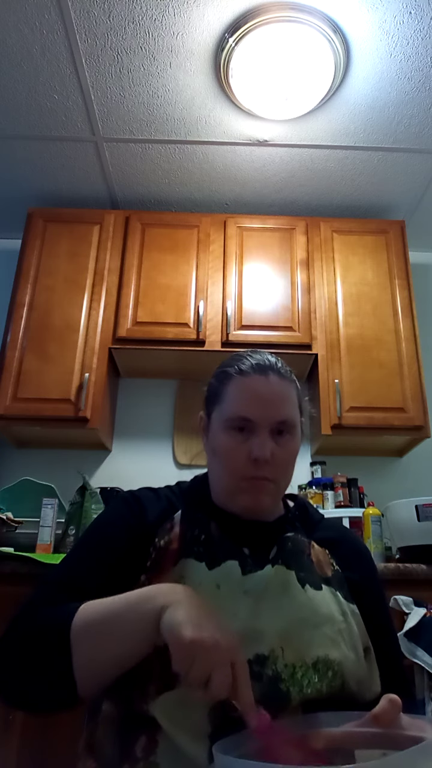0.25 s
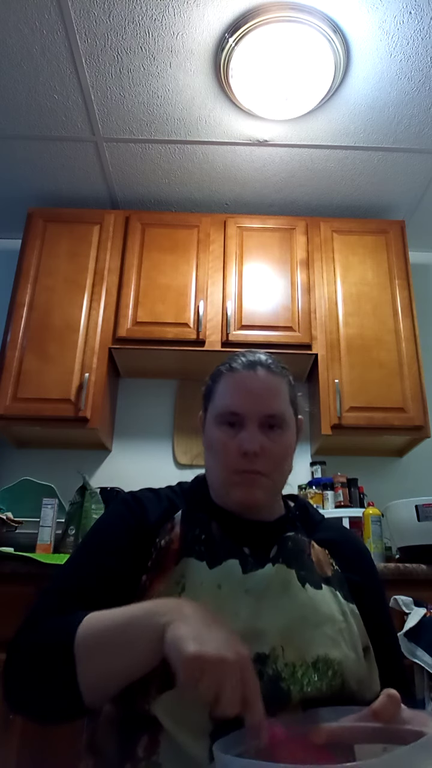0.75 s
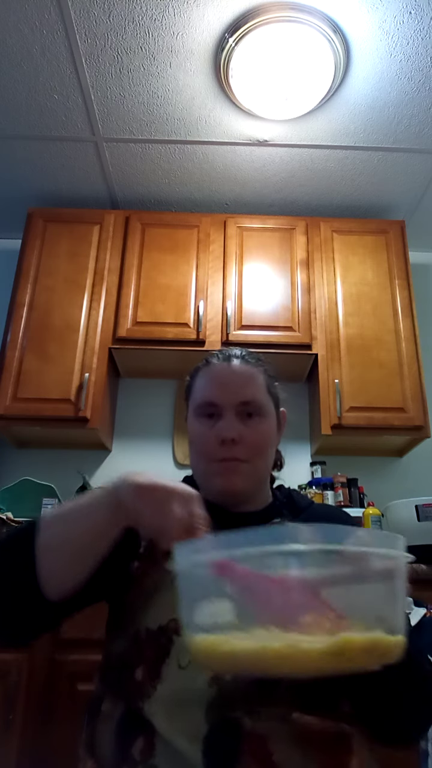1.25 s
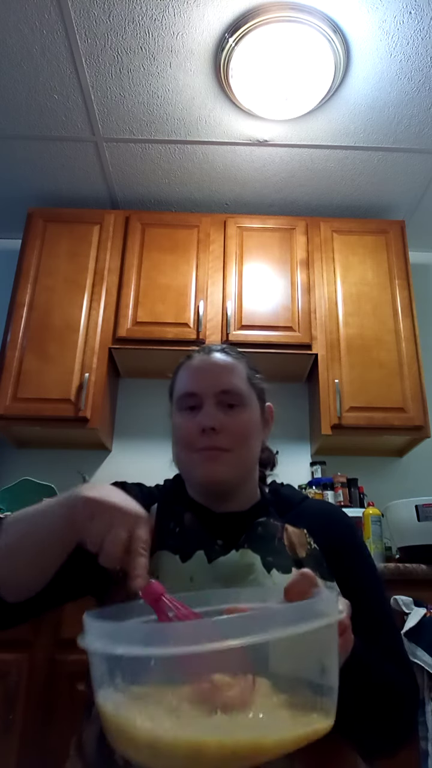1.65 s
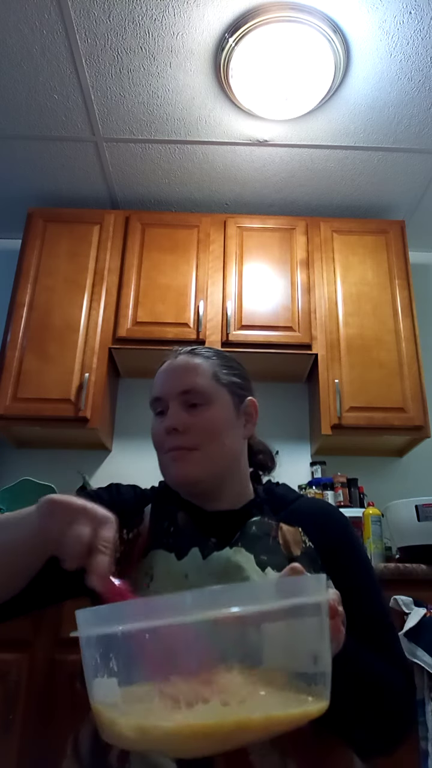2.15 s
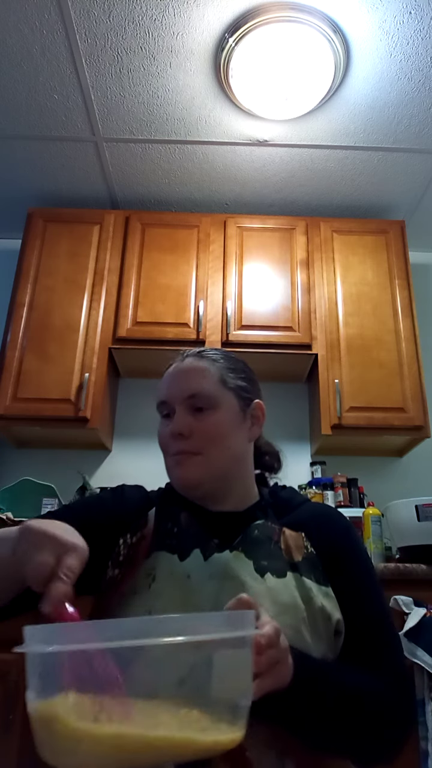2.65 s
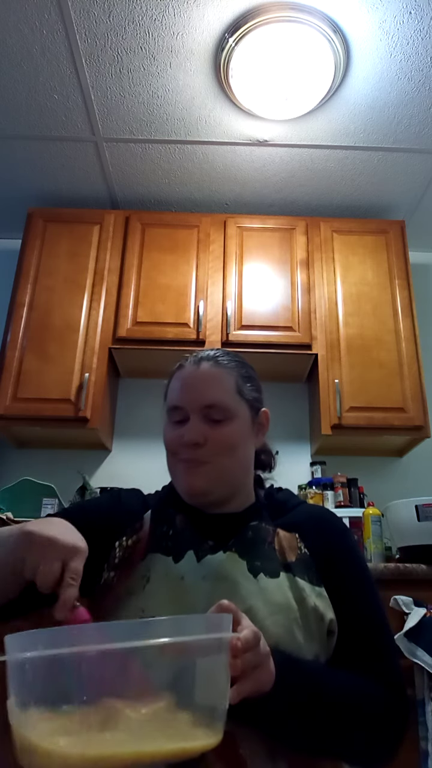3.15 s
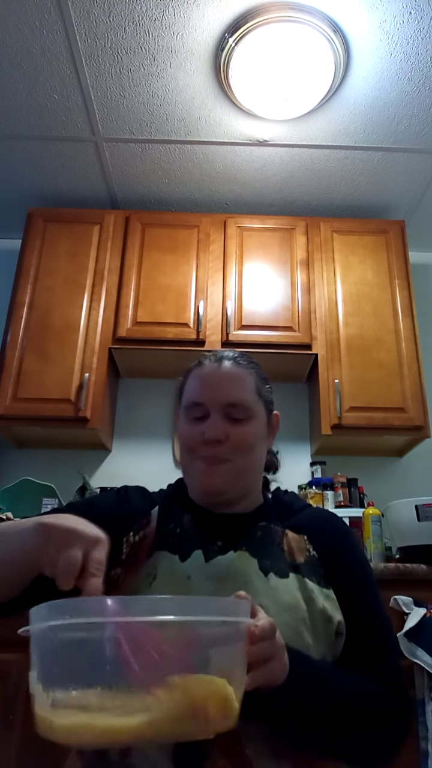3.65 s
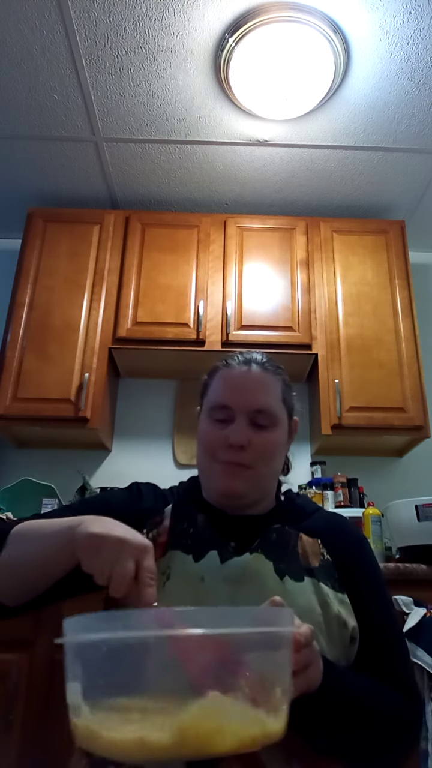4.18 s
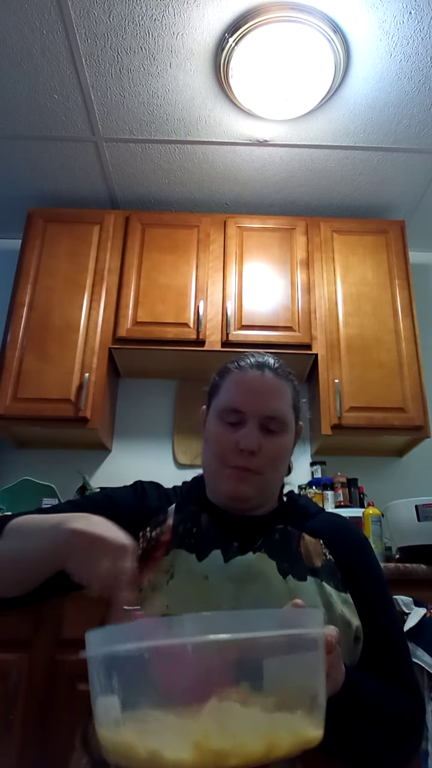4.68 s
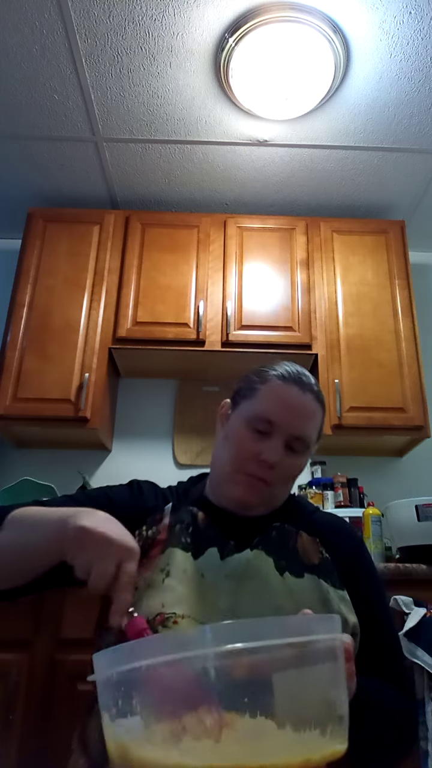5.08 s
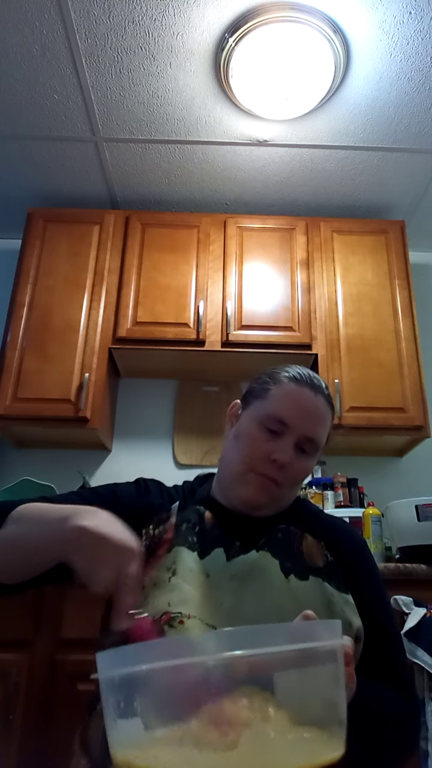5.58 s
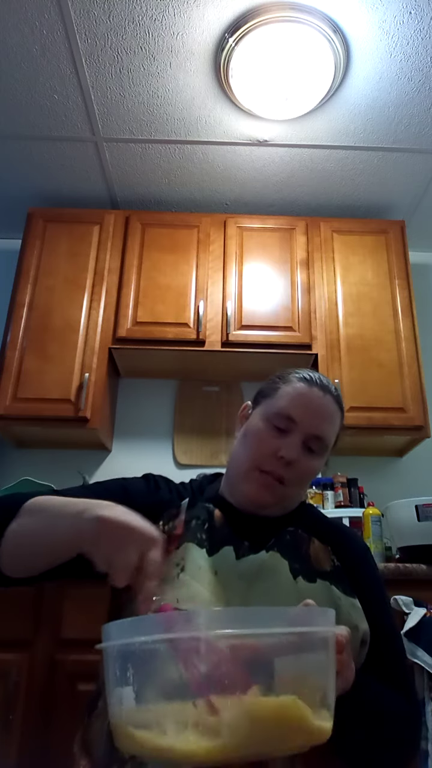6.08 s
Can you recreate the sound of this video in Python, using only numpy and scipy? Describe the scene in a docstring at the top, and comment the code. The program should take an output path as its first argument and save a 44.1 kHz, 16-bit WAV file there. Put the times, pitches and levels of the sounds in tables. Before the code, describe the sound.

A soft whisk beats a wet mixture in a hand-held plastic bowl, with sloshes, plops and a burst of hollow knocks midway.

```python
"""A soft whisk beats a wet mixture in a hand-held plastic bowl, in a quiet kitchen with a short echo.
First come dense strokes: filtered crackle sloshes and peels, ringing air pockets plop, wet films smack.
Knocks on the bowl wall (wall flexure, modes, contact ticks) then grow, loudest at 2.3 s, crowded until 3 s.
After that the strokes soften over a few faint knocks and plops, and the bubble froth slowly fades.
Hiss in drifting patches and steady noise of room and microphone run throughout."""
import sys
import numpy as np
from scipy import signal
from scipy.fft import rfft, irfft
from scipy.io import wavfile
from scipy.ndimage import map_coordinates

SR = 44100
rng = np.random.default_rng(int(sys.argv[2]) if len(sys.argv) > 2 else 0)


def put_to_file(sound):
    """Save the sound as 16-bit audio at rate SR, in the file named by the first command-line argument."""
    columns = np.atleast_2d(sound).T  # one column per channel
    safe = np.clip(columns, -1, 1)
    whole_steps = np.round(safe * 32767)
    wavfile.write(sys.argv[1], SR, whole_steps.astype(np.int16))


N = 278712


def amp(db):
    """Decibels to amplitude ratio."""
    return 10 ** (np.asarray(db) / 20)


def unit(x):
    """Scale to an RMS of 1."""
    return x / np.sqrt(np.mean(x ** 2) + 1e-20)


def unit_over(x, length_s):
    """Scale so that the energy of x equals an RMS of 1 held for length_s."""
    return x / np.sqrt(np.sum(x ** 2) / (length_s * SR))


def read(points, hz):
    """Spectrum points joined on a log-frequency axis."""
    point_hz, value = np.transpose(points)
    return np.interp(np.log(hz + 1), np.log(point_hz + 1), value)


def add(mix, start_s, sound):
    """Mix a sound in from start_s, cut at the end of the mix."""
    part = mix[max(round(start_s * SR), 0):][:len(sound)]
    part += sound[:len(part)]


def colour(x, gain_db, size=4096):
    """Causal minimum-phase filter; gain_db is a function of frequency."""
    hz = abs(np.fft.fftfreq(size, 1 / SR))
    log_gain = np.log(amp(gain_db(hz)))
    taps = np.fft.ifft(np.exp(np.conj(signal.hilbert(log_gain)))).real
    return signal.fftconvolve(x, taps[:size // 2])[:len(x)]


def cavity(x, hz, steep_db, skirt_db, ripple_db, low_hz=450):
    """The gap between whisk and mixture: a broad hump with chance resonances on it."""
    ripple = np.column_stack([np.geomspace(400, 12000, 48), rng.uniform(-1, 1, 48)])

    def gain_db(f):
        octaves = np.log2((f + 1) / hz)
        hump_db = -skirt_db * np.tanh(steep_db * octaves ** 2 / skirt_db)
        low_cut_db = -20 * np.log10(1 + (low_hz / (f + 20)) ** 2)
        return hump_db + ripple_db * read(ripple, f) + low_cut_db
    return colour(x, gain_db)


def snaps(t, per_s, wet=0.027):
    """Tiny impulses of random size and sign over a faint wet fizz."""
    chance, size, sign = rng.random((3, len(t)))
    impulses = (chance < per_s / SR) * (.3 - np.log(size)) * np.sign(sign - .5)
    return impulses + wet * rng.standard_normal(len(t))


def bubble(hz, cycles, glide=.08, swell=.2):
    """An air pocket swells in, rings and rises in pitch as it nears the surface; envelope peak 1."""
    age = np.arange(int(2 * cycles * SR / hz) + 2) * hz / SR / cycles
    envelope = (1 - np.exp(-(age / swell) ** 2)) * np.exp(-2 * age * np.sqrt(age))
    turns = cycles * age * (1 + glide * (age - 1) / 2)
    return envelope / envelope.max() * np.sin(2 * np.pi * turns)


def plop(db, hz, wet_db=-13, wet_s=0.0045, cycles_1khz=6.9, cycles_power=0.4):
    """One bubble and the spatter of its skin; returns the spatter's lead in s and the sound."""
    t = np.arange(SR // 25) / SR
    burst = snaps(t, per_s=4800) * np.exp(-(t / wet_s - 1) ** 2)
    spatter = cavity(burst, hz, steep_db=5.5, skirt_db=42, ripple_db=22)
    out = amp(wet_db) * spatter / abs(spatter).max()
    # smaller pockets ring for more cycles
    cycles = max(cycles_1khz * (hz / 1000) ** cycles_power, 3)
    add(out, wet_s / 2, bubble(hz, cycles))
    return wet_s / 2, amp(db) * out


def tear(db, hz, length_s):
    """A film tears in a quick run of snaps."""
    t = np.arange(SR // 10) / SR
    run = snaps(t, per_s=2400) * np.exp(-(t / length_s) ** 4)
    run = cavity(run, hz, steep_db=11.5, skirt_db=16.5, ripple_db=3.5)
    return amp(db) * unit_over(run, length_s)


# steady room tone and microphone hiss, spectrum shape: freq_hz [Hz], density_db [dB per Hz, relative]
HUSH_SPECTRUM = [(20, -19.5), (60, -3), (125, 2.5), (180, -3), (240, -0.5), (400, -7), (1700, -16.5),
                 (2050, -10.5), (2400, -23.5), (6200, -16), (8000, -25.5), (13800, -27), (15000, -15),
                 (16000, -15)]


def hush(level_db):
    """Steady room tone and hiss: noise shaped by a fixed spectrum."""
    hz = np.fft.rfftfreq(N, 1 / SR)
    spectrum = rfft(rng.standard_normal(N)) * amp(read(HUSH_SPECTRUM, hz))
    return amp(level_db) * unit(irfft(spectrum, N))


# whisk sliding through mixture, spectrum shape: freq_hz [Hz], density_db [dB per Hz, relative]
SWISH_SPECTRUM = [(250, -12), (700, -1.5), (1300, -18.5), (2050, 6), (2500, -6.5), (3400, 0.5), (6200, 0),
                  (8000, -15), (16000, -25.5)]


def swish(level_db=-72, patch_db=5.0, patch_hz=450, patch_s=.09):
    """The whisk slides through the mixture all the while: a faint hiss in drifting patches."""
    hz, t, z = signal.stft(rng.standard_normal(N), SR, nperseg=512)
    knots = rng.standard_normal((200, 400))
    grid = np.meshgrid(hz / patch_hz, t / patch_s, indexing="ij")
    patches = map_coordinates(knots, grid, order=1, mode="mirror")
    z *= amp(read(SWISH_SPECTRUM, hz)[:, None] + patch_db * patches)
    return amp(level_db) * unit(signal.istft(z, SR, nperseg=512)[1][:N])


def froth(low_hz=650, high_hz=7000, per_s=900, cycles=6, spread_db=5.5, level_db=-72, fade_db=6, count=40):
    """Fine bubbles burst all the time, fading in level as the beating settles."""
    out = np.zeros(N)
    for hz in np.geomspace(low_hz, high_hz, count):
        size = amp(spread_db * np.minimum(rng.exponential(1, N), 3))
        pops = size * (rng.random(N) < per_s / SR / count)
        out += signal.oaconvolve(pops, np.sqrt(hz) * bubble(hz, cycles))[:N]
    return unit(out) * amp(level_db + fade_db * np.linspace(.5, -.5, N))


# whisk strokes, shared by strays, films and sloshes: middle_s [s], slosh_db [dB before trim],
# bubble_hz [Hz], half_s [half length, s], film_db [dB before trim]
WHISK_STROKES = [(.02, -56.5, 1560, 0.019, -58), (0.148, -53.5, 1400, 0.038, -73.5),
                 (0.255, -57.5, 1337, 0.031, -73), (.46, -51.5, 1225, 0.073, -57.5),
                 (.655, -54, 1360, 0.033, -63.5), (.83, -55, 1357, 0.062, -56.5),
                 (1.001, -62, 1243, 0.045, -64), (1.317, -65, 1540, 0.04, -61),
                 (1.649, -55, 1400, 0.028, -57), (1.842, -92, 1610, 0.068, -62),
                 (2.208, -55.5, 1600, 0.018, -57), (2.554, -65.5, 1426, 0.046, -68),
                 (3.183, -67.5, 1050, 0.031, -86), (3.343, -67.5, 684, 0.045, -80),
                 (3.732, -64.5, 1784, .02, -78), (4.115, -63.5, 985, 0.026, -75),
                 (4.243, -69, 1010, 0.016, -55.5), (4.531, -62.5, 1386, 0.028, -63),
                 (4.717, -70.5, 1600, 0.057, -64.5), (4.863, -64, 1800, 0.014, -75.5),
                 (5.242, -63, 1136, 0.023, -71), (5.425, -63, 605, 0.036, -74),
                 (5.601, -63, 778, 0.033, -62), (6.042, -66.5, 970, 0.072, -63)]


def strays(count=12, per_s=50, over_slosh_db=8.5, spread_db=4, pitch_ratio=1.244, spread_octaves=0.78):
    """Each stroke sheds a few small plops at random, scattered about a pitch above its slosh."""
    out = np.zeros(N)
    for middle_s, slosh_db, bubble_hz, half_s, _ in WHISK_STROKES:
        for k in range(count):
            place, size, pitch = rng.uniform(-1, 1, 3)
            hz = bubble_hz * pitch_ratio * 2 ** (spread_octaves * pitch)
            lead_s, sound = plop(slosh_db + over_slosh_db + spread_db * size, hz)
            # longer strokes shed more; the last plop may be partial
            share = np.clip(2 * half_s * per_s - k, 0, 1)
            add(out, middle_s + half_s * place - lead_s, share * sound)
    return out


def films(trim_db=-1, scatter=0.19, early_hz=4900, late_hz=3200, stretch=1.5, clump_s=0.0079, clump_db=3.5):
    """Thin films peel off all through each stroke, in a clumped crackle that dulls as the beating goes on."""
    out, t = np.zeros(N), np.arange(-SR // 5, SR // 5) / SR
    for middle_s, _, _, half_s, film_db in WHISK_STROKES:
        length_s = half_s * stretch
        centre_hz = early_hz + (late_hz - early_hz) * middle_s * SR / N
        hz = centre_hz * np.exp(scatter * rng.normal())
        drift = np.interp((t - t[0]) / clump_s, np.arange(400), rng.uniform(-2, 2, 400))
        peel = snaps(t, per_s=1000) * amp(clump_db * drift) * np.exp(-(t / length_s) ** 2)
        peel = cavity(peel, hz, steep_db=8.5, skirt_db=18.5, ripple_db=10.5)
        peel = amp(film_db + trim_db) * unit_over(peel, length_s)
        add(out, middle_s + t[0], peel[middle_s + t >= 0])
    return out


def sloshes(trim_db=-2.0, gulp_db=0, gulp_cycles=22):
    """Each stroke squeezes out a swelling crowd of small bubbles and sets a trapped air pocket ringing."""
    out, t = np.zeros(N), np.arange(-SR // 5, SR // 5) / SR
    for middle_s, slosh_db, bubble_hz, half_s, _ in WHISK_STROKES:
        drive = snaps(t, per_s=1400) * np.exp(-(t / half_s) ** 2)
        gulp = signal.fftconvolve(drive, bubble(bubble_hz, gulp_cycles))[:len(t)]
        crowd = cavity(drive, bubble_hz, steep_db=6.5, skirt_db=35.5, ripple_db=6.0)
        slosh = unit(crowd) + amp(gulp_db) * unit(gulp)
        slosh = amp(slosh_db + trim_db) * unit_over(slosh, half_s)
        add(out, middle_s + t[0], slosh[middle_s + t >= 0])
    return out


# thick wet films snapping off the whisk: start_s [s], level_db [dB before trim], centre_hz [Hz], length_s [s]
FILM_SMACKS = [(0.048, -48.5, 2740, 0.008), (0.114, -45.5, 3280, 0.0063), (0.789, -47, 4100, 0.0036),
               (0.795, -39.5, 4330, 0.0099), (1.008, -42, 4000, 0.0051), (1.631, -47, 4300, 0.0053),
               (2.162, -50, 5200, 0.024), (2.229, -48.5, 5160, 0.018), (2.509, -46.5, 6870, 0.0092),
               (2.664, -48, 3800, 0.016), (2.985, -49, 6600, 0.0062), (3.601, -51.5, 3600, 0.011),
               (3.799, -47, 3700, 0.0089), (3.891, -50.5, 2170, 0.017), (4.542, -53, 3870, 0.015),
               (5.478, -57, 2310, 0.019), (6.23, -44, 2800, 0.015), (6.245, -41, 5140, 0.0092)]


def smacks(trim_db=-1):
    """The thick films, each torn in one go."""
    out = np.zeros(N)
    for start_s, level_db, centre_hz, length_s in FILM_SMACKS:
        add(out, start_s, tear(level_db + trim_db, centre_hz, length_s))
    return out


# loud single plops, air pockets of many sizes: start_s [s], level_db [dB], pitch_hz [Hz]
LOUD_PLOPS = [(.0509, -31.5, 2140), (.0815, -34.5, 526), (.1158, -35, 1060), (.118, -33, 3740),
              (.1368, -36.5, 1620), (.4265, -36.5, 2510), (.4423, -37.5, 770), (0.483, -35, 1440),
              (.5428, -17, 1006), (.7258, -41.5, 1780), (.7628, -36, 6000), (.786, -35, 1570),
              (.8523, -35, 1250), (1.5705, -39.5, 1400), (1.7989, -40.5, 6050), (2.1639, -39.5, 700),
              (2.24, -37.5, 5200), (2.2614, -39, 1222), (2.517, -33, 6940), (2.5925, -30.5, 3214),
              (2.8774, -34.5, 875), (3.7033, -41, 777), (3.8067, -36, 1700), (3.8934, -27.5, 732),
              (4.6704, -46, 1400), (5.4724, -38, 1720)]


def plops():
    """Loud single plops: air pockets of many sizes ring, low to high; each spatter leads slightly."""
    out = np.zeros(N)
    for start_s, level_db, pitch_hz in LOUD_PLOPS:
        lead_s, sound = plop(level_db, pitch_hz)
        add(out, start_s - lead_s, sound)
    return out


# whisk against bowl: start_s [s], level_db [dB], wall_hz [settled pitch, Hz],
# thump_db [whole-bowl weight, relative dB], hard_db [contact tick, relative dB]
WALL_KNOCKS = [(0.079, -43, 321, 12, 1), (.5420, -25.5, 458, -7, 3.5), (1.144, -22.5, 498, 7.5, 8),
               (2.0700, -20.5, 518, 7.5, 3.5), (2.3204, -12.5, 513, 6, 1.5), (2.677, -34, 685, -31, 6.5),
               (2.7294, -23.5, 592, 6, 3), (2.8760, -28, 680, -36, 7.5), (2.9378, -25.5, 640, 11, 8.5),
               (3.8010, -44, 720, -22.5, -10), (3.8935, -35.5, 511, -9, -33), (5.0699, -40, 500, -19, -25),
               (5.549, -38.5, 545, -6.5, -20.5), (6.2330, -48, 587, -9, -9)]
# bowl modes: mode_hz [Hz, before scatter], level_db [relative dB], t60_s [s]
BOWL_MODES = [(97, -23, 0.066), (153, -25, 0.089), (265, -18, 0.097), (311, -14, 0.044), (378, -8, .04),
              (442.3, -9.5, 0.071), (507.4, -14.5, 0.24), (600, -33, 0.042), (741, -14, 0.047),
              (948, -11, 0.025), (1143, -11.5, 0.033), (1676, -20, 0.13), (1920, -13, 0.025),
              (2786, -29, 0.011), (2990, -30, .025)]
# contact tick response: freq_hz [Hz], gain_db [dB]
TICK_RESPONSE = [(100, -7.5), (380, 5), (900, 4.5), (1700, 3), (2300, -0.5), (3200, 1.5), (4000, -3.5),
                 (5200, -2.5), (6700, -1.5), (11000, -14), (16000, -15.5)]


def tick_colour(x):
    """Response of the contact between whisk and wall."""
    return colour(x, lambda f: read(TICK_RESPONSE, f))


def bowl_ring(t, thump_db, strike_db=2.5):
    """Sum of decaying bowl modes; the strike point and the moving load vary them."""
    out = np.zeros(len(t))
    for mode_hz, level_db, t60_s in BOWL_MODES:
        # each blow's thump weight raises or lowers the lowest modes
        low_db = thump_db * np.clip((600 - mode_hz) / 450, 0, 1)
        gain = amp(level_db + low_db + strike_db * rng.uniform(-2.1, 1))
        hz = mode_hz * rng.normal(1, 0.02)
        out += gain * amp(-60 * t / t60_s) * np.sin(2 * np.pi * hz * t)
    return out


def knocks(wall_cycles=4, wall_db=1, sag=0.22, push_s=0.00074, push_db=-15, ring_db=-1, tick_db=-7, tick_s=0.0011,
           chatter_db=-12, chatter_s=0.014, graze_db=-20, graze_s=0.0054):
    """Each blow flexes the wall, pushes the whole bowl, rings its modes and chatters at the contact."""
    out, t = np.zeros(N), np.arange(SR // 4) / SR
    for start_s, level_db, wall_hz, thump_db, hard_db in WALL_KNOCKS:
        # the wall is stiff while the whisk presses on it; its pitch sags as it lets go
        bend = sag * wall_cycles / 2 * (1 - np.exp(-2 * t * wall_hz / wall_cycles))
        wall = np.sin(2 * np.pi * (wall_hz * t + bend)) * np.exp(-(t * wall_hz / wall_cycles) ** 2)
        push = (1 - t / push_s / 2) * t / push_s * np.exp(1 - t / push_s)
        body = amp(wall_db) * wall + amp(ring_db) * bowl_ring(t, thump_db)
        body = body * (1 - np.exp(-t / tick_s)) + amp(push_db + thump_db) * push
        # the first loop of the whisk ticks, the others follow in a quick chatter
        tick = rng.choice([-1., 1.], len(t)) * t / tick_s * np.exp(1 - t / tick_s)
        chatter = amp(chatter_db) * unit(snaps(t, per_s=1200)) * np.exp(-t / chatter_s)
        contact = amp(tick_db + hard_db) * tick_colour(tick + chatter)
        add(out, start_s, amp(level_db) * (body + contact))
        # the whisk grazes the wet wall just before it lands: a reversed decay
        graze = tick_colour(snaps(t, per_s=20000) * np.exp(-t / graze_s))[:SR // 40]
        add(out, start_s - len(graze) / SR, amp(level_db + graze_db) * graze[::-1])
    return out


# nearby surfaces: delay_s [mean, s], gain [linear]
SURFACE_ECHOES = [(.0021, 0.055), (.0072, 0.25), (0.0091, 0.12), (0.0188, 0.14), (0.026, 0.21)]
# kitchen reverberation: freq_hz [Hz], t60_s [s]
KITCHEN_DECAY = [(100, .16), (500, 0.17), (1300, 0.11), (3000, 0.15), (6500, 0.19), (12000, 0.091)]


def kitchen(x, wet_db=-7.5, build_s=0.0029, thin_hz=1300, sway=0.0507, turn_hz=0.98, count=3):
    """Close reflections and a short diffuse tail, thin in the bass; both shift as the bowl is moved about."""
    t, now = np.arange(SR // 2) / SR, np.arange(N) / SR
    out = x.copy()
    for delay_s, gain in SURFACE_ECHOES:
        path_s = delay_s * (1 + sway * np.sin(2 * np.pi * (turn_hz * now + rng.random())))
        out += gain * np.interp(now - path_s, now, x, left=0)
    for k in range(count):
        sparse = rng.choice([-1., 1.], len(t)) * (rng.random(len(t)) < .15)
        taps = sparse * (1 - np.exp(-(t / build_s) ** 2))
        hz, age, z = signal.stft(taps, SR, nperseg=256)
        z *= np.sqrt(hz / (hz + thin_hz))[:, None]
        z *= amp(-60 * age / read(KITCHEN_DECAY, hz)[:, None])
        tail = signal.istft(z, SR, nperseg=256)[1]
        # the tails take turns
        share = np.sqrt(2 / count) * np.cos(np.pi * (turn_hz * now + k / count))
        out += amp(wet_db) * signal.fftconvolve(x * share, tail / np.linalg.norm(tail))[:N]
    return out


# microphone response: freq_hz [Hz], gain_db [dB]
MIC_RESPONSE = [(25, -32), (70, -5.5), (6600, -3), (7400, -11.5), (8400, -16.5), (11000, -16), (12500, -29),
                (16000, -17)]


def microphone(x):
    """Frequency response of the microphone."""
    return colour(x, lambda f: read(MIC_RESPONSE, f))


def scene():
    """All sources in the kitchen, through the microphone, plus its steady hush."""
    mixture = froth() + swish() + strays() + films() + sloshes()
    room = kitchen(mixture + smacks() + plops() + knocks())
    return (microphone(room) + hush(level_db=-69.5))[None]


def record(dry, edge_hz=15900):
    """The recorder's band limit: a linear-phase low-pass."""
    taps = signal.firwin(511, edge_hz, window=("kaiser", 9), fs=SR)
    return signal.oaconvolve(dry, taps[None], "same")


dry = scene()
out = record(dry)
put_to_file(out)
```